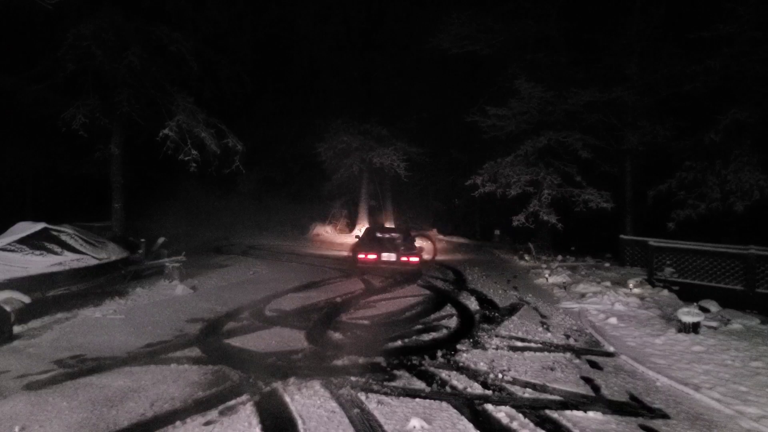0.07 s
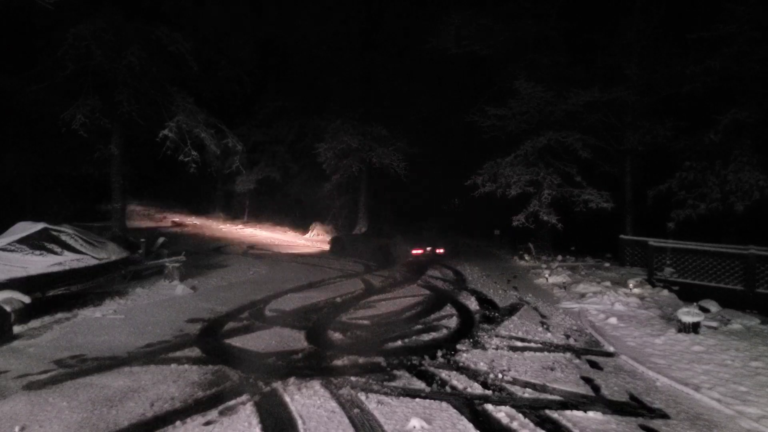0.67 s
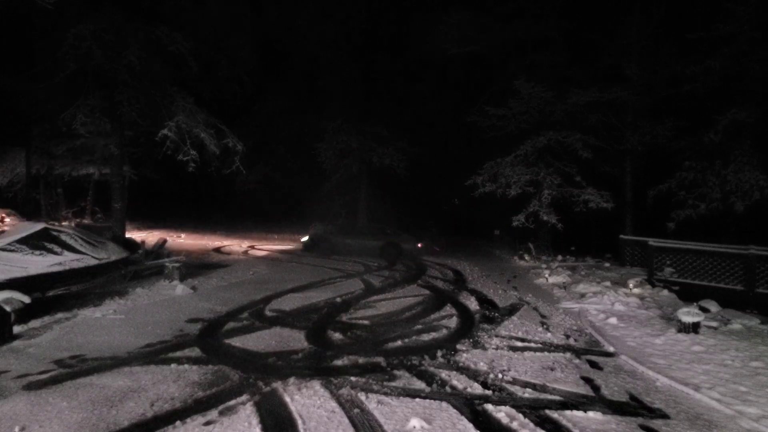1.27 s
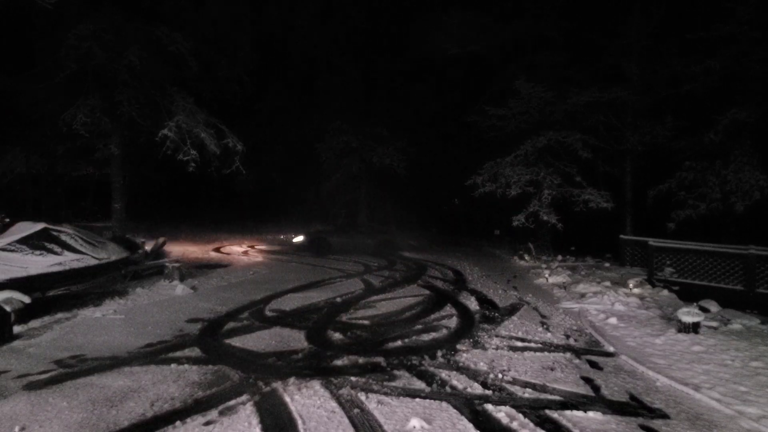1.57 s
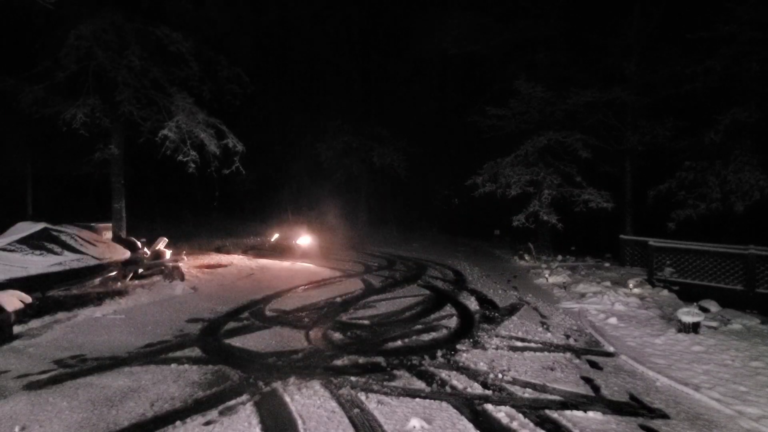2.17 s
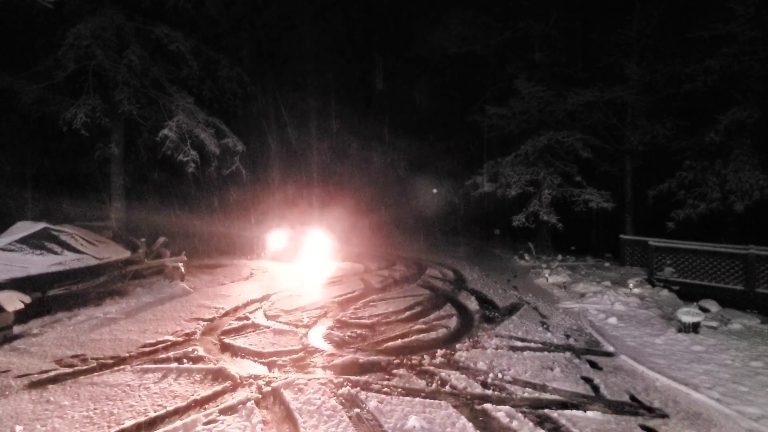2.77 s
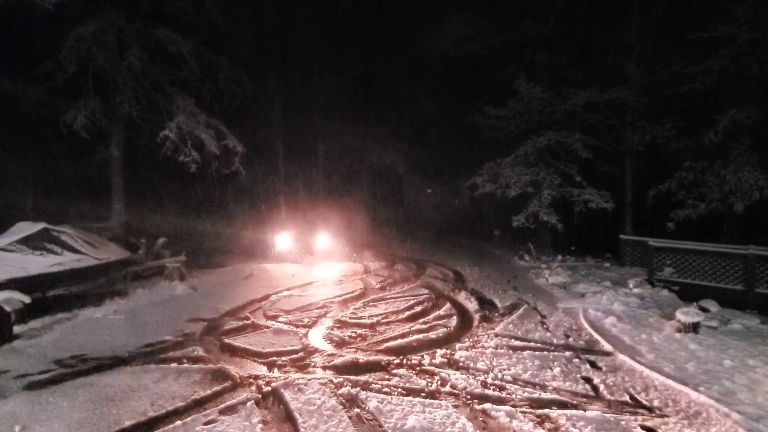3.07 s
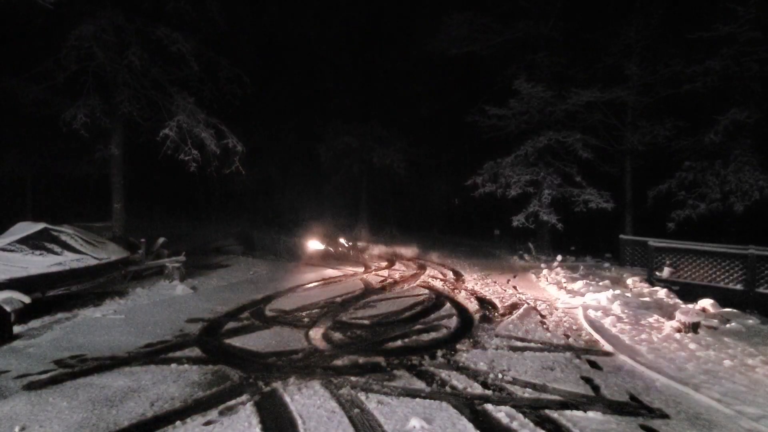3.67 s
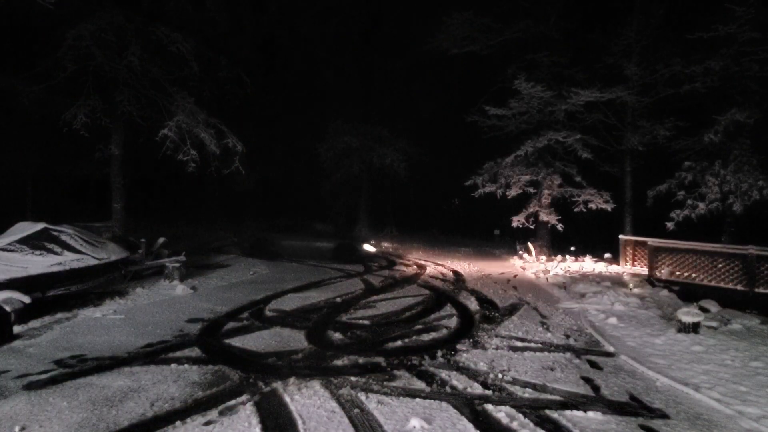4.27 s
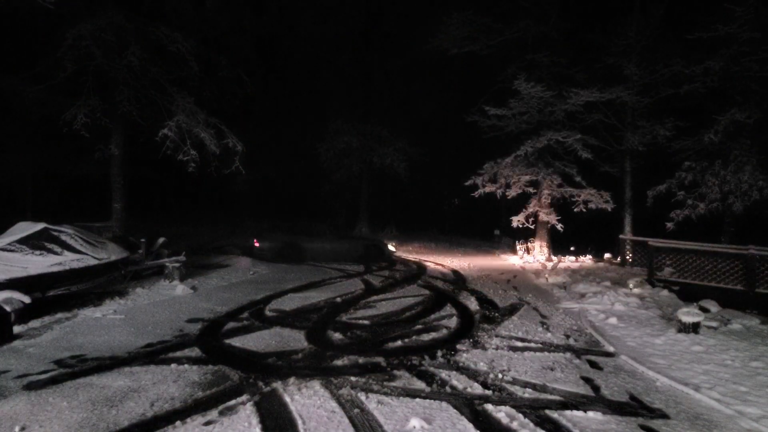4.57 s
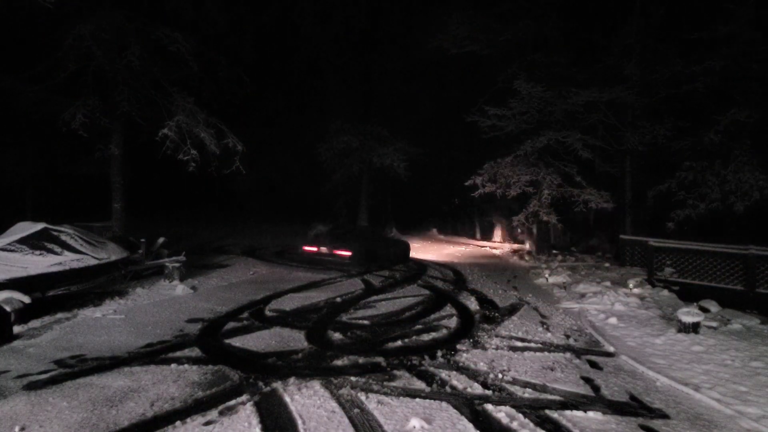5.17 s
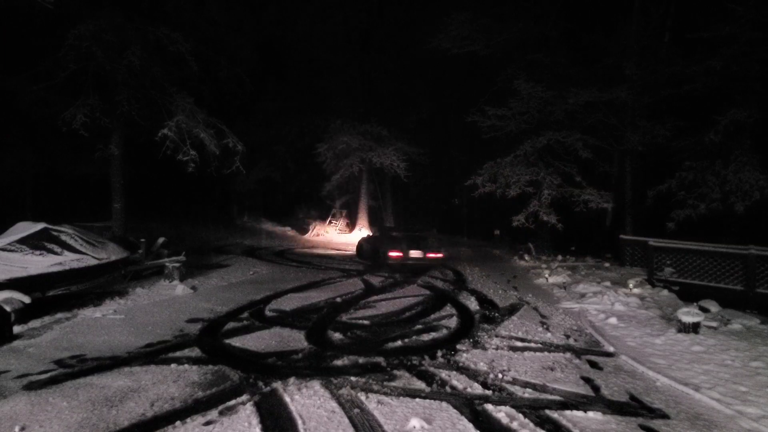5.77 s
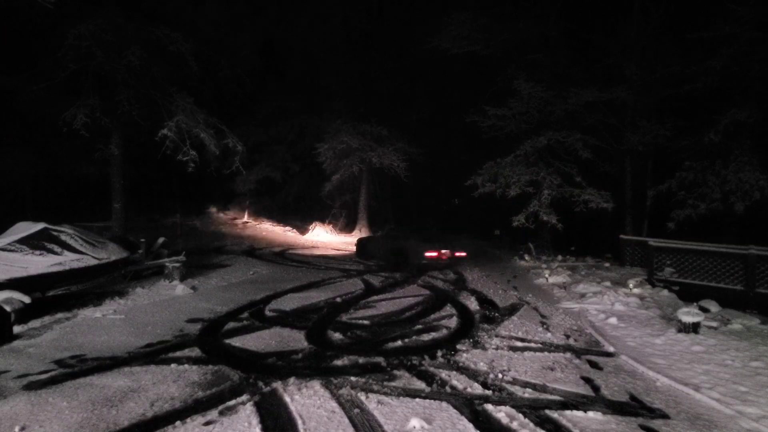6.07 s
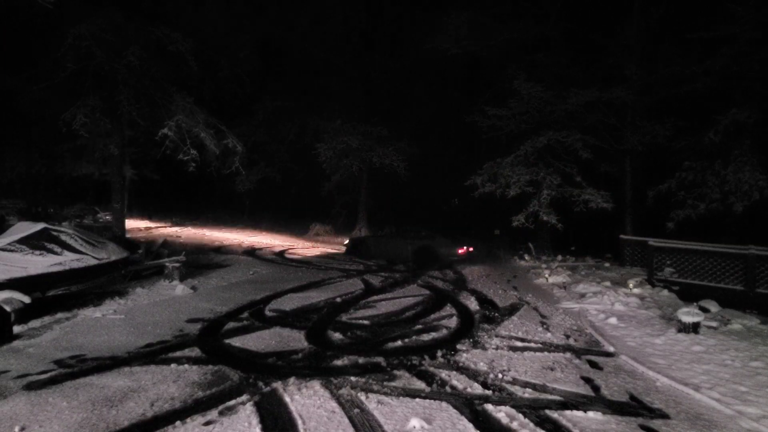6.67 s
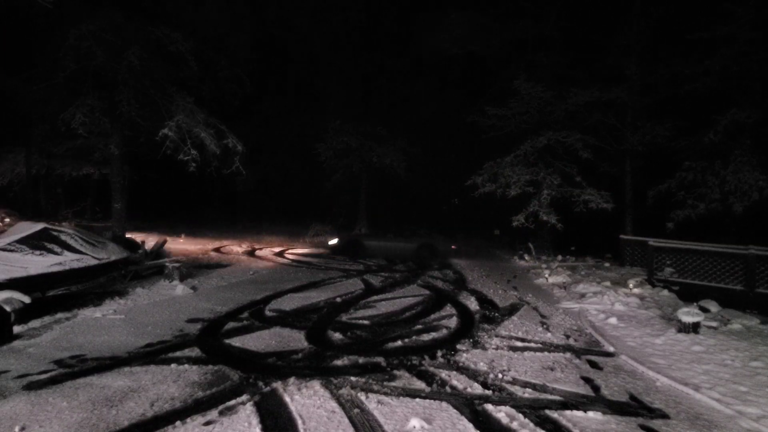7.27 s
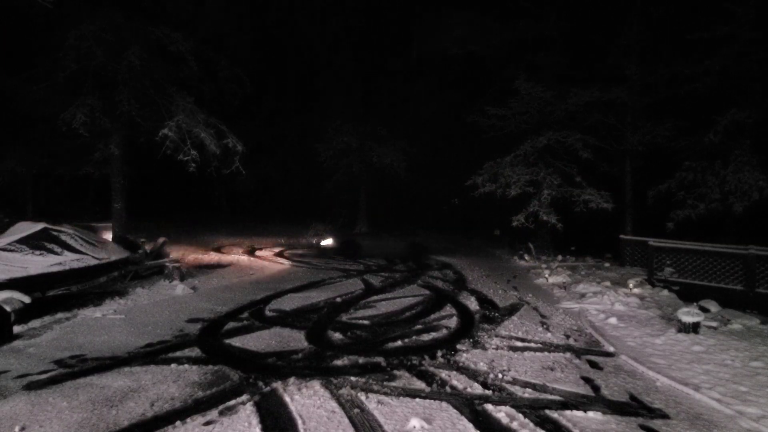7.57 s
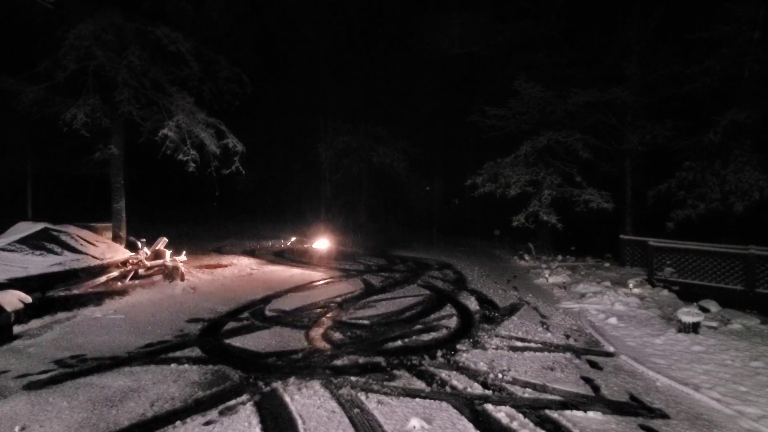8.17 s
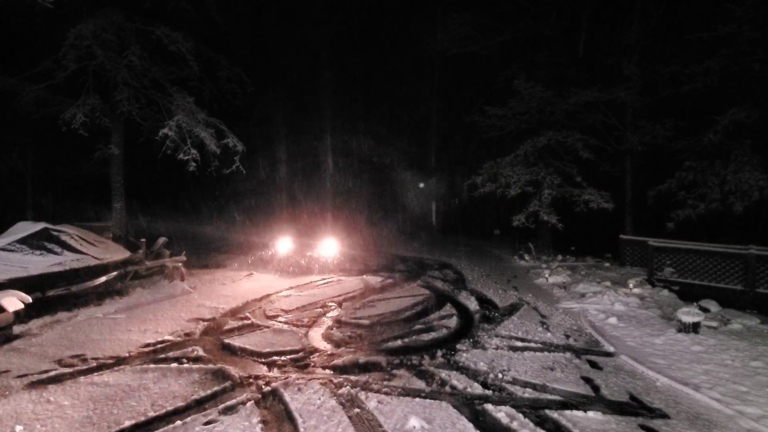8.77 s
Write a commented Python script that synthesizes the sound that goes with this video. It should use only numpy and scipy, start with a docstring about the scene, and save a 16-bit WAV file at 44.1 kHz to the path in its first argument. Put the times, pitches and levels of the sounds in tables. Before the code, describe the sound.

A car spins circles on snow, its engine droning and revving up and down while the slipping tyres hiss and squeak.

```python
"""A snowy yard at night, where a six-cylinder car spins in circles some way off.
Its exhaust drones, burbles and rasps as the revs rise and fall, and the engine bay roars
each time the nose swings round. The slipping tyres hiss, throw slush, flick grit
against the car and squeak. The trees around give a faint answer."""
import sys
import numpy as np
from scipy import signal
from scipy.fft import rfft, irfft, next_fast_len
from scipy.io import wavfile
from scipy.ndimage import uniform_filter1d, map_coordinates

SR = 44100
rng = np.random.default_rng(int(sys.argv[2]) if len(sys.argv) > 2 else 0)


def put_to_file(sound):
    """Save the sound as 16-bit audio at rate SR, in the file named by the first command-line argument."""
    columns = np.atleast_2d(sound).T  # one column per channel
    safe = np.clip(columns, -1, 1)
    whole_steps = np.round(safe * 32767)
    wavfile.write(sys.argv[1], SR, whole_steps.astype(np.int16))


N = 392931
CYLINDERS, CRUISE_HZ = 6, 160  # cruising speed is given in firings a second
LAP_S = 5.7


def amp(db):
    """Turn decibels into a gain."""
    return 10 ** (np.asarray(db) / 20)


def unit(x):
    """Scale a signal to an average strength (rms) of 1."""
    return x / np.sqrt(np.mean(x ** 2) + 1e-20)


def along(points, hz):
    """Read between (Hz, value) points, spaced as the ear hears pitch."""
    freqs, values = np.transpose(points)
    return np.interp(np.log(hz + 1), np.log(freqs + 1), values)


def clock():
    """The time of every sample, in seconds."""
    return np.arange(N) / SR


def curves(rows):
    """Join timed rows with straight lines: one curve for each column after the time."""
    times, *columns = np.transpose(rows)
    return [np.interp(clock(), times, column) for column in columns]


def swell(middle, half):
    """A smooth rise and fall around a moment."""
    return np.exp(-((clock() - middle) / half) ** 2 / 2)


def held(start, end, ramp):
    """1 from start to end, with sloping edges."""
    t = clock()
    return np.clip((t - start) / ramp + .5, 0, 1) * np.clip((end - t) / ramp + .5, 0, 1)


def lap(start):
    """Swings from -1 at start to +1 half a circle later."""
    return -np.cos(2 * np.pi * (clock() - start) / LAP_S)


def wobble(rate):
    """A smooth curve through `rate` random points a second."""
    points = rng.standard_normal(int(N * rate / SR) + 4)
    coarse = map_coordinates(points, [np.arange(0, N, 32) * rate / SR])
    return np.interp(np.arange(N), np.linspace(0, N, len(coarse)), coarse)


def note(angle, rough, rate):
    """A plain tone whose strength and timing flutter."""
    angle = angle + rng.uniform(0, 2 * np.pi)
    tone = (1 + rough * wobble(rate)) * np.sin(angle) + rough * wobble(rate) * np.cos(angle)
    return np.sqrt(2 / (1 + 2 * rough ** 2)) * tone


def filtered(x, response):
    """Turn each frequency up or down by response(hz)."""
    size = next_fast_len(N + SR // 4)
    return irfft(rfft(x, size) * response(np.fft.rfftfreq(size, 1 / SR)), size)[..., :N]


# How wide scattered sound is. Each row: frequency in Hz, sides against middle in dB.
STEREO_WIDTH = [(60, -26), (180, -16), (350, -9), (700, -8.5), (1400, -6), (2800, -4.5), (6000, -0.5),
                (12000, 1.5)]

def spread(pair, colour):
    """Shape two noises by a colour (rows of Hz, relative dB) into stereo, wider in the treble."""
    def response(hz):
        mid_db = along(colour, hz)
        return amp([mid_db, mid_db + along(STEREO_WIDTH, hz)])
    mid, side = filtered(pair, response)
    return np.array([mid + side, mid - side]) / np.std(mid)


def rush(colour):
    """Steady stereo noise of a given colour."""
    return spread(rng.standard_normal((2, N)), colour)


def bursts(rows):
    """Short swells of narrow, fluttering noise."""
    out = np.zeros((2, N))
    for middle, half, hz, width, db in rows:
        band = [(hz - 2 * width, -40), (hz - width / 2, -4), (hz, 0),
                (hz + width / 2, -4), (hz + 2 * width, -40)]
        out += amp(db + 2.4 * wobble(45)) * swell(middle, half) * rush(band)
    return out


def dappled(x, depth_db):
    """Echoes off the ground and trunks add and cancel in narrow patches as the car moves."""
    spectrum = signal.stft(x, nperseg=2048)[2]
    patches = uniform_filter1d(rng.standard_normal(spectrum.shape[1:]), size=2, axis=0)
    patches = uniform_filter1d(patches, size=9, axis=1)
    patches -= uniform_filter1d(patches, size=9, axis=0)  # what one gains, its neighbours lose
    gains = unit(amp(depth_db * unit(patches)))
    return signal.istft(spectrum * gains, nperseg=2048)[1][:, :N]


# How fast the engine runs. Each row: time in seconds, firings a second.
ENGINE_SPEED = [(0.0, 152.7), (0.38, 180.4), (0.52, 170.2), (0.71, 154.3), (1.36, 153.0), (1.98, 217),
                (2.61, 197.8), (2.85, 178.7), (3.07, 159.3), (3.3, 173.9), (3.52, 172.3), (4.02, 235.6),
                (4.26, 231.2), (4.73, 165), (5.05, 168.3), (5.46, 137.5), (5.58, 120.8), (5.7, 85.2),
                (5.9, 86.4), (6.26, 146.3), (6.66, 177.3), (7.17, 234.7), (7.45, 240.8), (7.66, 224.2),
                (8.07, 192.9), (8.2, 172.3), (8.62, 143.5), (8.91, 114)]

def four_stroke():
    """Rate and angle of the engine cycle, in which each cylinder fires once."""
    cycle_hz = curves(ENGINE_SPEED)[0] / CYLINDERS
    return cycle_hz, 2 * np.pi * np.cumsum(cycle_hz) / SR


def revs():
    """Firing rate above cruising speed, in Hz."""
    return curves(ENGINE_SPEED)[0] - CRUISE_HZ


def load(climb_hz_per_s=60):
    """How hard the engine pulls: towards +1 while the revs climb, -1 while they fall."""
    climb = uniform_filter1d(np.gradient(revs()) * SR, size=SR // 5)
    return np.tanh(climb / climb_hz_per_s)


def clatter(angle, count=3, size=256):
    """Noise that repeats with each engine cycle while its pattern slowly changes."""
    place = angle / (2 * np.pi) % 1 * size
    shares = np.array([wobble(7) for _ in range(count)])
    patterns = [np.interp(place, np.arange(size), rng.standard_normal(size), period=size)
                for _ in range(count)]
    return unit(np.sum(shares * patterns, axis=0) / np.linalg.norm(shares, axis=0))


# The main note, one pulse for each firing. Each row: time in seconds, level in dB.
FIRING_LEVELS = [(0.0, -19), (0.36, -16), (0.55, -21.5), (0.8, -15), (1.42, -20), (1.98, -29.4),
                 (2.25, -15.9), (2.67, -25), (3.23, -16), (3.91, -16.5), (4.06, -30.5), (4.32, -23),
                 (4.52, -42.5), (4.88, -16), (5.19, -19.8), (5.46, -39.5), (5.81, -21), (5.92, -11.5),
                 (6.17, -20.5), (6.68, -11), (7.19, -32.5), (7.39, -19), (7.91, -27), (8.62, -28),
                 (8.91, -51)]
# The throttle eases and one bank of three cylinders booms, an octave below the main note.
# Each row: start in seconds, end in seconds, level in dB.
THROTTLE_LIFTS = [(0.334, 0.557, -22), (2.722, 2.96, -21.5), (4.2, 4.56, -18.5), (4.5, 4.8, -16),
                  (4.98, 5.458, -21.5), (6.51, 7.28, -29.5), (7.883, 8.353, -19), (8.62, 8.802, -37)]
# What the muffler lets through of the crank's low notes. Each row: pitch in Hz, level in dB.
MUFFLER_LEVELS = [(40, -60.5), (56, -43), (68, -38.5), (90, -37.5), (103, -43.5), (120, -30), (142, -30.5),
                  (158, -20.5)]

def drone(cycle_hz, angle, bank_rest_db=-38):
    """Exhaust pulses leave the muffler as four low notes, at 6, 3, 4 and 2 times the cycle rate."""
    crank_db, twice_crank_db = along(MUFFLER_LEVELS, np.outer([2, 4], cycle_hz))
    bank = amp(bank_rest_db + 2 * wobble(3.4))
    bank += sum(amp(db) * held(start, end, ramp=.19) for start, end, db in THROTTLE_LIFTS)
    firing = amp(curves(FIRING_LEVELS)[0] + 0.46 * wobble(7.2))
    notes = firing * note(CYLINDERS * angle, rough=0.056, rate=34)
    notes += bank * amp(2 * wobble(11)) * note(3 * angle, rough=0.068, rate=15)
    notes += amp(twice_crank_db + 1.5 * wobble(7)) * note(4 * angle, rough=0.15, rate=25)
    return notes + amp(crank_db) * note(2 * angle, rough=0.16, rate=20)


# The deep colour of the burble. Each row: frequency in Hz, relative level in dB.
BURBLE_COLOUR = [(20, -40.5), (35, -26), (52, -17), (68, -3.5), (90, 2.5), (122, -3), (150, -13), (178, 0),
                 (205, -15.5), (250, -30.5), (500, -64.5)]

def burble(angle, cruise_db=-34.5, db_per_hz=-0.0346, repeating=0.36):
    """Uneven firing, partly the same in every cycle: stronger at low revs and around each stumble."""
    steady = amp(cruise_db + db_per_hz * revs())
    stumbles = sum(amp(db) * swell(middle, half=.04) for middle, _, _, db in WEAK_FIRINGS)
    uneven = rng.standard_normal((2, N)) + repeating * np.array([clatter(angle), clatter(angle)])
    return np.hypot(steady, stumbles) * spread(uneven, BURBLE_COLOUR)


# The exhaust's higher notes. Each row: multiple of the cycle rate, relative level in dB.
EXHAUST_OVERTONES = [(7, -0.5), (8, -1), (9, 0.5), (10, -10.5), (11, -14), (13, -12.5), (14, -5), (15, -7),
                     (16, -8), (17, -19), (18, -2.5)]
# How the pipe favours some pitches. Each row: frequency in Hz, boost in dB.
PIPE_RESONANCE = [(150, -31), (250, -5.5), (290, -1), (325, 3), (365, -0.5), (440, 2), (560, -2.5),
                  (900, -15.5)]
# The colour of the rushing gas. Each row: frequency in Hz, relative level in dB.
GAS_COLOUR = [(30, -49), (100, -6.5), (230, 0), (320, -5), (380, -4), (450, -2), (560, -7), (750, -22),
              (1500, -47)]
# The note an octave above the main one. Each row: pitch in Hz, base level in dB.
OCTAVE_LEVELS = [(165, -40.5), (181, -33.5), (215, -51.5), (248, -40), (280, -47.5), (308, -42.5),
                 (335, -41.5), (365, -51.5), (425, -41), (475, -37.5)]
# Hard pulls with the tailpipe towards the listener.
# Each row: start in seconds, end in seconds, extra rasp in dB, extra octave in dB.
HARD_PULLS = [(-.1, .15, 4.5, -0.5), (5.815, 6.15, 3.5, 12.5), (6.192, 7.04, 1.5, 7.5)]

def rasp(cycle_hz, angle, cruise_db=-41, db_per_hz=0.0876):
    """Overtones slide through the pipe's resonances and fade in and out over rushing gas."""
    pull_db, extra_octave_db = sum(np.outer(extra, held(start, end, ramp=0.053))
                                   for start, end, *extra in HARD_PULLS)
    gains = [amp(db + along(PIPE_RESONANCE, k * cycle_hz) + 4 * wobble(4))
             for k, db in EXHAUST_OVERTONES]
    uneven = angle + .045 * wobble(45)  # uneven firing times smear the highest notes most
    overtones = sum(gain * note(k * uneven, rough=.6, rate=30)
                    for gain, (k, _) in zip(gains, EXHAUST_OVERTONES))
    gas = overtones / np.linalg.norm(gains, axis=0) + amp(-0.4) * rush(GAS_COLOUR)
    octave_db = along(OCTAVE_LEVELS, 2 * CYLINDERS * cycle_hz) + extra_octave_db + 2.5 * load()
    octave = amp(octave_db) * note(2 * CYLINDERS * uneven, rough=.4, rate=28)
    return amp(cruise_db + db_per_hz * revs() + pull_db) * gas + octave


# The colour of the engine bay's roar. Each row: frequency in Hz, relative level in dB.
ROAR_COLOUR = [(60, -56), (250, -24), (480, -1), (620, 1.5), (760, -2), (940, -1.5), (1100, -5.5),
               (1450, -7), (2000, -11.5), (3000, -17), (6000, -40.5)]
# The roar swells or sinks with short stabs of the throttle. # Each row: middle in seconds, half length in
# seconds, change in dB.
ROAR_SURGES = [(1.84, 0.086, 0.5), (2.447, 0.1, -5), (3.0, 0.17, -2.5), (4.42, 0.19, 2),
               (4.992, 0.059, 5.5), (6.45, .25, 2), (7.297, 0.04, 0.5), (8.503, 0.18, 2.5)]

def roar(angle, cruise_db=-44, db_per_hz=0.1563, fan_db=-47, shield_db=-5.5):
    """Air intake and fan growl together; the intake grows with revs and load."""
    hidden = np.maximum(-lap(0.15), 0) ** 2  # the car's body hides the engine bay once a lap
    intake = amp(cruise_db + db_per_hz * revs() + 1.4 * load() + shield_db * hidden)
    surge_db = sum(db * swell(middle, half) for middle, half, db in ROAR_SURGES) + .5 * wobble(14)
    throb = unit(1 + 0.088 * np.cos(2 * angle))  # one pulse for each turn of the crank
    growl = rng.standard_normal((2, N)) + 0.43 * np.array([clatter(angle), clatter(angle)])
    growl = dappled(spread(growl, ROAR_COLOUR), depth_db=2)
    return np.hypot(intake, amp(fan_db)) * amp(surge_db) * throb * growl


def grains(per_second, scatter_db):
    """Two streams of tiny impacts of unequal size."""
    strikes = rng.random((2, N)) < per_second / SR
    return unit(strikes * rng.standard_normal((2, N)) * amp(scatter_db * rng.standard_normal((2, N))))


# The colours of sheared snow and of flung drops. Each row: frequency in Hz, relative level in dB.
HISS_COLOUR = [(700, -10), (1500, -2.5), (2100, -2), (2900, -0.5), (4000, -0.5), (5000, -2), (5500, -7),
               (6100, -14), (7500, -24), (10000, -45)]
SPRAY_COLOUR = [(1500, -19.5), (3500, 7), (5100, 6.5), (6200, -3), (7100, -0.5), (7900, -8), (8800, -2.5),
                (10300, -8), (12200, -1.5), (14000, -8), (15600, -16.5)]
# The tyres break loose (+) or bite (-).
# Each row: middle in seconds, half length in seconds, change in dB.
TYRE_SLIPS = [(0.148, 0.17, 1), (1.803, 0.16, -0.5), (2.143, 0.076, 4), (2.662, 0.063, 2.5),
              (2.948, 0.048, -1.5), (3.314, 0.031, 4.5), (3.58, 0.12, 1.5), (4.123, 0.099, 5),
              (4.71, .12, -2.5), (5.308, 0.026, 5.5), (5.55, 0.21, 2.5), (5.952, 0.05, -4), (6.36, .1, 2.5),
              (8.1, 0.2, 2), (8.88, 0.15, -3.5)]

def tyres(hiss_db=-43, spray_db=-52.5, db_per_hz=0.0543):
    """The tread shears wet snow: a grainy hiss and a brighter spray, growing with wheelspin."""
    slip_db = sum(db * swell(middle, half) for middle, half, db in TYRE_SLIPS)
    slip_db += db_per_hz * np.maximum(revs(), 0) + 0.75 * wobble(22)
    shear = unit(rng.standard_normal((2, N)) + 0.33 * grains(per_second=1500, scatter_db=2))
    drops = unit(rng.standard_normal((2, N)) + 0.73 * grains(per_second=2000, scatter_db=4))
    facing_db = 2.4 * lap(0.055)  # louder when the car faces the listener
    hiss = amp(hiss_db + slip_db + facing_db) * spread(shear, HISS_COLOUR)
    return hiss + amp(spray_db + slip_db) * spread(drops, SPRAY_COLOUR)


# Lumps of slush, and in the last row a broader squeak. Each row: middle and half length in seconds, pitch and
# width in Hz, level in dB.
SLUSH_THROWS = [(.393, .012, 4600, 1800, -46), (2.06, .05, 10800, 3400, -54),
                (4.062, 0.015, 5600, 2200, -41.5), (4.08, .035, 12590, 3000, -55.5),
                (5.6, 0.14, 3900, 1500, -43), (7.36, .06, 13300, 1600, -59), (7.77, .07, 6815, 1200, -52.5)]

def slush():
    """The wheels throw off slush in short, bright splashes; near the end the tread gives a broad squeak."""
    return bursts(SLUSH_THROWS)


# The engine stumbles.
# Each row: middle and half length in seconds, share of the sound lost, added burble in dB.
WEAK_FIRINGS = [(0.57, 0.014, 0.51, -23), (0.655, 0.004, 0.48, -27.5), (3.039, 0.0022, 0.47, -21.5),
                (3.113, 0.0072, 0.91, -33), (3.467, 0.0043, 1, -23), (3.627, 0.02, 0.64, -36),
                (4.813, 0.0039, 0.53, -18), (5.522, 0.01, 0.38, -24.5), (5.658, 0.0087, 0.36, -28),
                (5.801, 0.016, .9, -24), (6.983, 0.014, 0.72, -37), (7.57, 0.018, 0.55, -39)]

def stumbling():
    """A gain that dips briefly wherever a few firings are weak."""
    return 1 - sum(min(lost, 1) * swell(middle, half) for middle, half, lost, _ in WEAK_FIRINGS)


# Stones hit the car. Each row: start in seconds, level in dB, treble cut in dB per octave.
GRIT_HITS = [(.7816, -36, 4), (3.2685, -33.5, 4), (5.3053, -24.5, -2), (5.6336, -29.5, 4),
             (6.4213, -31.5, 6)]
# The colour of one tick. Each row: frequency in Hz, relative level in dB.
TICK_COLOUR = [(600, -23), (1400, 4), (2300, 2.5), (4000, 7.5), (5500, -0.5), (8500, -13.5), (10500, -24.5),
               (13000, -18.5), (16000, -32)]

def grit(fade_s=.015, treble_hz=3000):
    """Each flung stone gives a short, dry tick; soft hits lose their treble."""
    t, out = clock(), np.zeros((2, N))
    for start, db, cut in GRIT_HITS:
        colour = [(hz, level - cut * np.log2(max(hz / treble_hz, 1))) for hz, level in TICK_COLOUR]
        fallen_db = 60 * np.clip(t - start, 0, .2) / fade_s
        out += amp(db - fallen_db) * (t >= start) * rush(colour)
    return out


# Tread squeaks. Each row: middle and half length in seconds, pitch and width in Hz, level in dB.
TREAD_SQUEAKS = [(1.9, .11, 1424, 380, -43), (2.19, 0.12, 4770, 800, -36), (2.67, 0.062, 4800, 700, -43.5),
                 (3.31, 0.041, 4700, 800, -47), (4.12, 0.085, 5096, 650, -37), (7.78, 0.07, 4970, 384, -36),
                 (8.07, 0.046, 6350, 650, -51), (8.34, 0.033, 6523, 380, -52),
                 (8.43, 0.054, 6150, 550, -52.5)]

def squeaks():
    """Where rubber reaches the ground it sticks and slips in rough chirps."""
    return bursts(TREAD_SQUEAKS)


# The path of one falling squeal. Each row: time in seconds, pitch in Hz, level in dB.
SQUEAL_PATH = [(2.33, 1970, -64), (2.44, 1945, -45), (2.53, 1902, -40), (2.66, 1862, -44),
               (2.87, 1760, -55)]

def squeal():
    """Rubber squeals on wet ground, with a weaker note an octave below."""
    t = clock()
    pitch, level_db = curves(SQUEAL_PATH)
    angle = 2 * np.pi * np.cumsum(pitch) / SR
    sounding = (t > SQUEAL_PATH[0][0]) & (t < SQUEAL_PATH[-1][0])
    tone = note(angle, rough=.55, rate=110) + amp(-5) * note(angle / 2, rough=.7, rate=70)
    return sounding * amp(level_db) * tone


def boom(angle, overtone=9, level_db=-18.5):
    """As the throttle shuts, one falling overtone briefly sets the tailpipe ringing."""
    return amp(level_db) * swell(4.345, half=.038) * note(overtone * angle, rough=.12, rate=40)


def circling(x, mean_ms=0.026, swing_ms=0.058):
    """Sound reaches the nearer ear first; the car's direction swings to and fro once a lap."""
    left_lead = (mean_ms + swing_ms * lap(0.29)) * SR / 1000
    return np.array([map_coordinates(ear, [np.arange(N) + side * left_lead / 2], mode="nearest")
                     for ear, side in zip(x, (1, -1))])


def trees(x, fade_s=0.96, build_s=0.059):
    """A soft, blurred echo from the edge of the wood."""
    t = np.arange(SR // 2) / SR
    tail = rng.standard_normal((2, len(t))) * amp(-60 * t / fade_s) * (1 - np.exp(-t / build_s))
    return signal.fftconvolve(x, tail / np.linalg.norm(tail[0]), axes=1)[:, :N]


def scene():
    """Engine and tyres travel round the yard together, and the trees answer."""
    cycle_hz, angle = four_stroke()
    low_exhaust = stumbling() * (drone(cycle_hz, angle) + burble(angle))
    engine = low_exhaust + rasp(cycle_hz, angle) + boom(angle) + roar(angle)
    car = engine + dappled(tyres(), depth_db=2) + slush() + grit() + squeaks() + squeal()
    return circling(car) + amp(-19) * trees(car)


# The balance of the microphone's two openings. Each row: frequency in Hz, left minus right in dB.
MIC_BALANCE = [(80, -2.45), (200, 2), (380, -0.5), (700, 1.5), (1300, 1.5), (2400, 1.5), (4600, 6.5),
               (7000, -3.5), (9000, 1), (11500, -14.5), (15000, -21.5)]

def record(dry, top_hz=15720):
    """Each opening colours the sound its own way, mostly in the treble; nothing passes above top_hz."""
    def openings(hz):
        gains = amp(np.outer([1, -1], along(MIC_BALANCE, hz)) / 2)
        return gains / np.sqrt(np.mean(gains ** 2, axis=0)) * (hz < top_hz)
    return filtered(dry, openings)


dry = scene()
out = record(dry)
put_to_file(out)
```